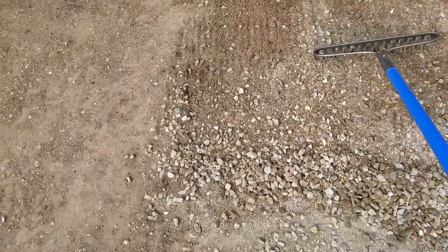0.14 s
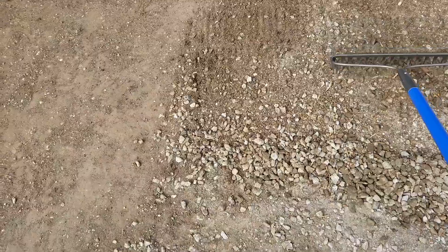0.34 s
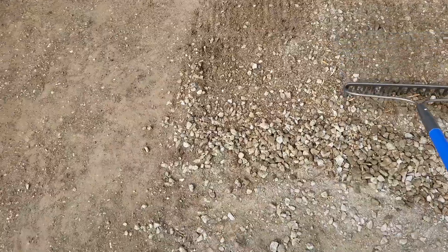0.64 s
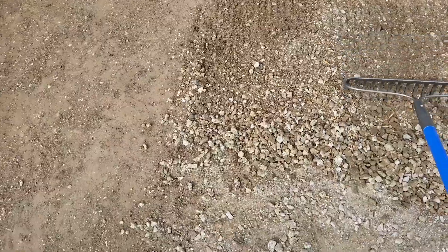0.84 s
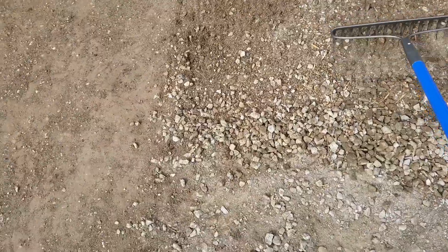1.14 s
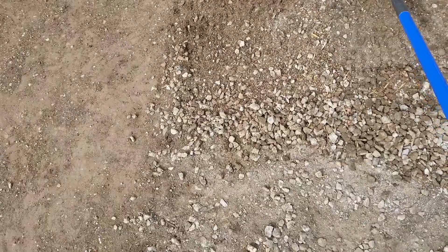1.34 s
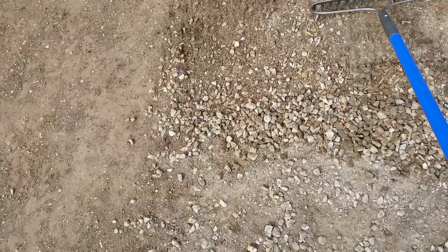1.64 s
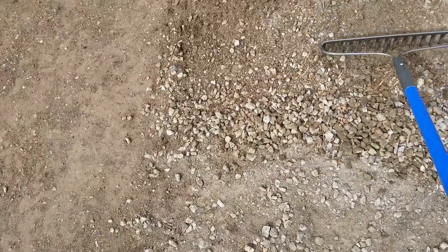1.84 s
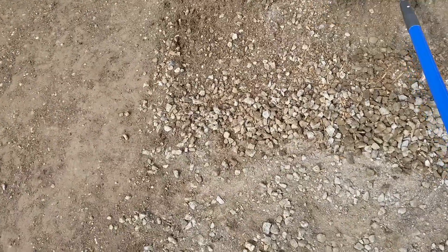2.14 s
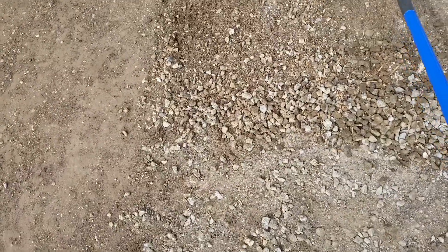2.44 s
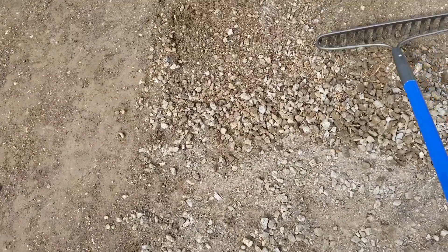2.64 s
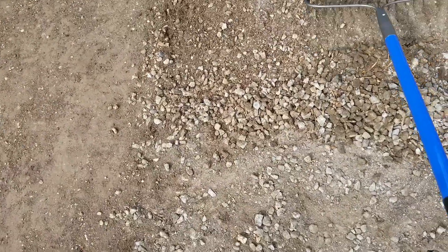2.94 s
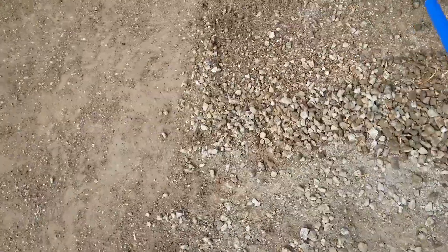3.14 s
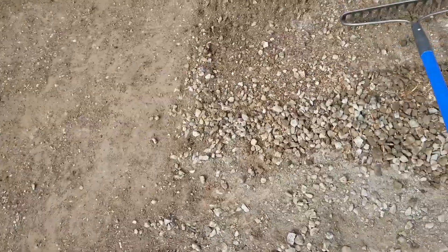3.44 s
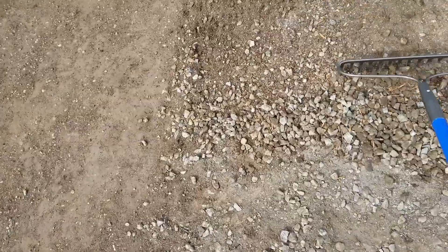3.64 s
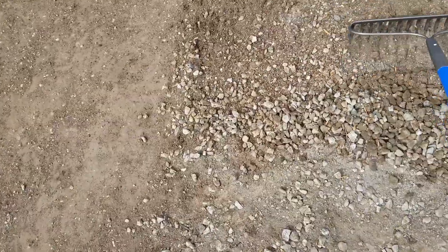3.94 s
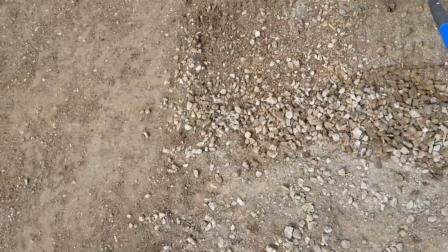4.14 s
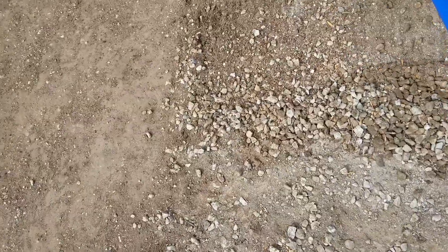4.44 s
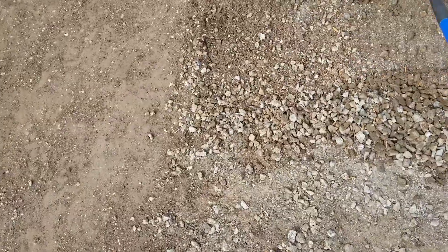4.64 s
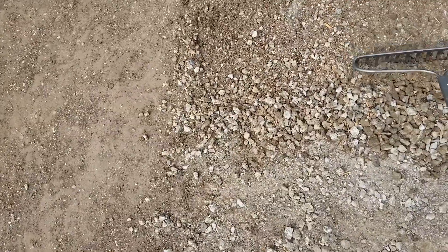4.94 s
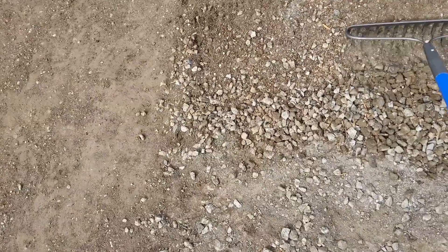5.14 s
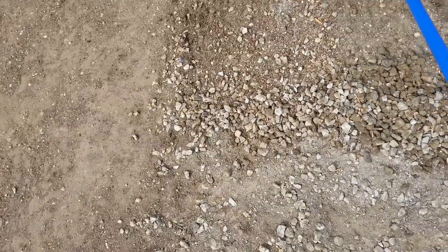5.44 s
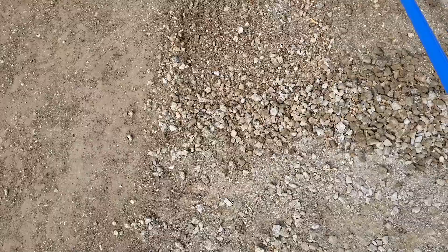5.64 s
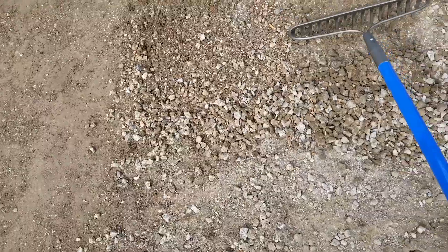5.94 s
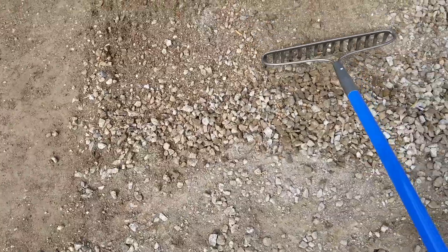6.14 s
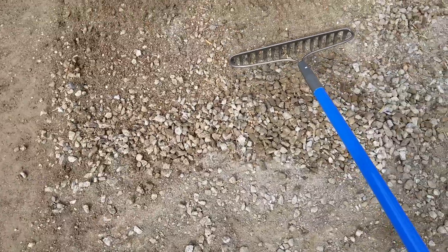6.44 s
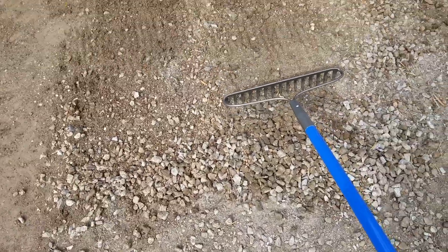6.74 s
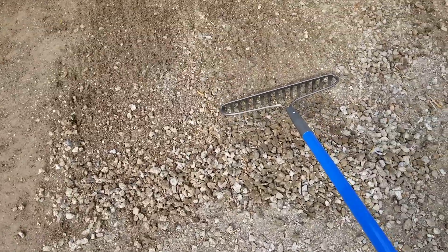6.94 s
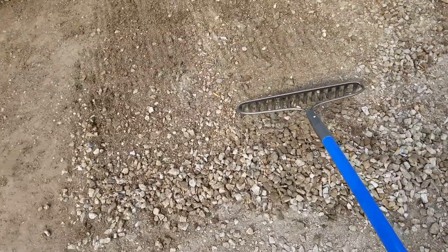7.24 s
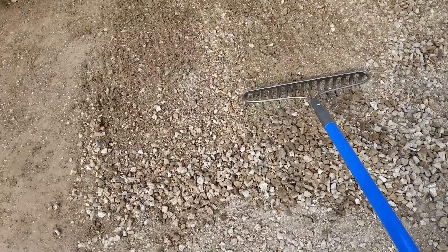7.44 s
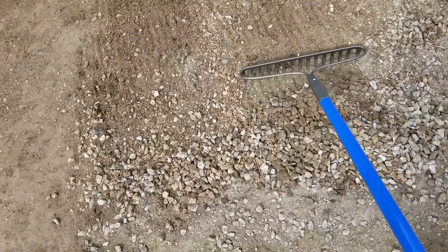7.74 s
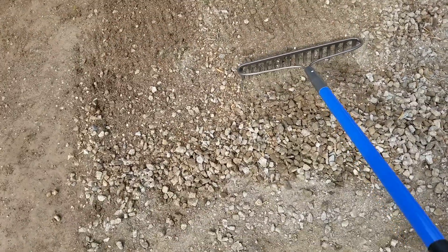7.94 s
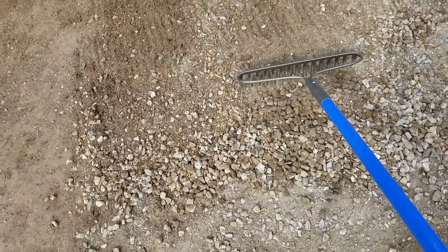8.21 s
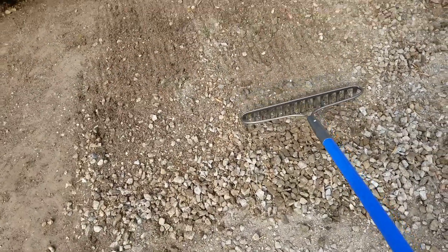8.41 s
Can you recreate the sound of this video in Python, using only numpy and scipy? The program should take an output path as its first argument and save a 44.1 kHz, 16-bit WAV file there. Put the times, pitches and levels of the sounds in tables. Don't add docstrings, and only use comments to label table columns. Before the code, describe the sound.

Outdoors, very close, a steel rake works loose gravel on dry dirt. From 0.1 s it scrapes in uneven strokes of roughly a quarter to half a second: harsh grainy drag, hissing grit, rattling pebbles, sharp stone clacks and short metallic rings from the tines, with duller knocks on the crossbar. A bright squeal comes at 1.1 s, a strong bite near 1.9 s and a dense run of clacks around 2.5 s. At 2.9-3.05 s low thuds and a loud boomy bump shake the microphone. Strokes continue until about 6.2 s, then stop. Sparse faint pebble ticks follow over a distant low engine drone and soft hiss. A small cluster of clacks sounds at 7.3-7.45 s, then faint squeaks and shuffles around 7.7-8.1 s, and a firmer shove with ringing stones from 8.35 s to the end at about 8.6 s. Dry, no reverberation.

```python
import sys
import numpy as np
from scipy import signal
from scipy.fft import rfft, irfft, next_fast_len
from scipy.io import wavfile
from scipy.ndimage import uniform_filter1d, map_coordinates

SR = 44100
rng = np.random.default_rng(int(sys.argv[2]) if len(sys.argv) > 2 else 0)


def waveform_to_disk(signal):
    frames = np.transpose(np.atleast_2d(signal))
    scaled = np.clip(frames, -1, 1) * 32767
    samples = np.round(scaled).astype(np.int16)
    wavfile.write(sys.argv[1], SR, samples)


def level_to_linear(level):
    exponent = np.asarray(level, float) / 20
    return 10 ** exponent


N = 378245


def unit(x):
    return x / np.sqrt(np.mean(x ** 2) + 1e-20)


def along(points, hz):
    f, v = np.transpose(points)
    return np.interp(np.log(hz + 1), np.log(f + 1), v)


def wobble(rate, shape=np.asarray):
    coarse = np.arange(0, N + 64, 64)
    knots = rng.standard_normal(int(N * rate / SR) + 4)
    curve = map_coordinates(knots, [coarse * rate / SR])
    return np.interp(np.arange(N), coarse, shape(curve))


def filtered(x, response):
    m = next_fast_len(N + 8192)
    return irfft(rfft(x, m) * response(np.fft.rfftfreq(m, 1 / SR)), m)[..., :N]


def noise(spectrum, alike, patchy_db=0):
    alike = np.clip(alike, 0, 1)
    common, left, right = rng.standard_normal((3, N + 512))
    pair = np.sqrt(alike) * common + np.sqrt(1 - alike) * np.array([left, right])
    if patchy_db:
        z = signal.stft(pair, nperseg=256)[2]
        field = rng.standard_normal(z.shape[1:])
        field = uniform_filter1d(field, size=3, axis=0)
        field = uniform_filter1d(field, size=9, axis=1)
        pair = signal.istft(z * level_to_linear(patchy_db * unit(field)), nperseg=256)[1]
    return unit(filtered(pair[:, :N], lambda hz: level_to_linear(along(spectrum, hz))))


def pings(s, gain, hz, t60, shift, size, rise_s=1e-5):
    out = []
    for side in (.5, -.5):
        start = s * SR + side * shift
        whole = np.floor(start).astype(int)
        t = np.maximum(np.arange(size) - (start - whole)[:, None], 0) / SR
        rise = 1 - np.exp(-t / rise_s)
        decay = np.exp(-np.log(1000) * t / t60[:, None])
        wave = gain[:, None] * rise * decay * np.sin(2 * np.pi * hz[:, None] * t)
        at = np.clip(whole[:, None] + np.arange(size), 0, N)
        out.append(np.bincount(at.ravel(), wave.ravel(), N + 1)[:N])
    return np.array(out)


def slides(rate, decay_s, spread_db, rest):
    kick = (rng.random(N) < rate / SR) * level_to_linear(spread_db * rng.uniform(-0.85, 1, N))
    return unit(rest + signal.lfilter([1], [1, -np.exp(-1 / (decay_s * SR))], kick))


# (frequency [Hz], level difference [dB])
PORT_BALANCE = [(60, -1.5), (250, -1), (1300, -2), (4400, -3), (15000, -1)]


def rake():
    effort_db = effort()
    busy = slides(rate=60, decay_s=0.013, spread_db=4.5, rest=0.92)
    touch = np.clip((effort_db + 67) / 12, 0, 1)
    bright = level_to_linear(-33 + 0.75 * (effort_db + 30))
    stone_hits, bar_hits = stone_contacts(), crossbar_contacts()

    x = tines(scraping(effort_db, touch, busy), stone_hits, bar_hits)
    x += pebbles(bright * busy * touch) + grit(bright, busy) + soil(effort_db)
    x += clacks(*stone_hits[:3]) + knocks(*bar_hits) + thuds() + rubs()

    lag = 12.85
    side = np.array([[.5], [-.5]])

    def port(f):
        return level_to_linear(side * along(PORT_BALANCE, f)) * np.exp(-2j * np.pi * f * side * lag / SR)

    return filtered(x, port)


# (bite time [s], lift time [s], first level [dB], last level [dB], belly in the middle [dB])
STROKES = [(0.14, 0.581, -30, -35.5, 4.5), (0.783, 1.265, -30.5, -26, -1), (1.445, 1.537, -34, -36, 5.5),
           (1.583, 1.746, -28, -26, 6.5), (1.78, 1.86, -45.5, -40, 2), (1.936, 2.2, -18, -34.5, 0.5),
           (2.347, 2.608, -27, -28, -3), (2.714, 2.948, -35.5, -29, 8.5), (2.997, 3.064, -41, -37, 13.5),
           (3.26, 3.506, -39.5, -26.5, 5), (3.688, 3.979, -34.5, -33, 4.5), (4.15, 4.281, -21, -32, -4.5),
           (4.412, 4.783, -39, -22, 0.5), (5, 5.408, -27, -36.5, 6.5), (5.606, 6.003, -34, -34.5, 4),
           (6.032, 6.073, -55, -50, -5), (5.47, 5.58, -66, -46.5, 0.5), (6.084, 6.227, -27, -34.5, 0)]
NUDGES = [
    (7.02, 7.112, -60, -60.5, 4),
    (7.152, 7.3, -47, -59.5, 5.5),
    (7.313, 7.464, -40.5, -36, 7),
    (7.508, 7.583, -46.5, -54.5, 5),
    (7.656, 7.853, -57.5, -61, 8.5),
    (7.89, 8.186, -61, -54.5, 9),
    (8.225, 8.321, -33, -44.5, 10),
    (8.369, 8.469, -17.5, -37, 2),
    (8.505, 8.586, -36.5, -43, -4.5),
]


def effort():
    bite_db_per_s, lift_db_per_s, rest_db = 214.5, 139.5, -72
    lift_bends = 1000
    t = np.arange(0, N, 32) / SR
    power = level_to_linear(2 * rest_db) + 0 * t
    for bite, lift, first_db, last_db, belly_db in STROKES + NUDGES:
        u = np.clip((t - bite) / (lift - bite), 0, 1)
        db = first_db + (last_db - first_db) * u + belly_db * np.sin(np.pi * u)
        faster = 3.15 if bite > 5.5 else 1
        early, late = faster * np.maximum([bite - t, t - lift], 0)
        db -= bite_db_per_s * early + (lift_db_per_s + lift_bends * late) * late
        power = power + level_to_linear(2 * db)
    return np.interp(np.arange(N) / SR, t, 10 * np.log10(power))


def scraping(effort_db, touch, busy):
    uneven = level_to_linear(5.12 * np.clip(rng.standard_normal(N), -3, 2.5))
    return level_to_linear(effort_db - 9.5) * touch * busy * rng.standard_normal(N) * uneven


# (frequency [Hz], width [Hz], level [dB])
TINE_MODES = [(508, 34, -8.5), (718.6, 14, -5), (772, 35, 0), (909.5, 7.5, -5), (1032, 25, 1.5),
              (1130, 57, 1.5), (1300, 25, 6), (1655, 26, 7.5), (2040, 16, 10), (2255, 75, 10),
              (2758, 11, -1.5), (3180, 33, -6), (3323, 54, -9.5), (3520, 25.2, -8.5), (4190, 16, -3),
              (4840, 40, -6), (5100, 15, -3), (5430, 18, -5.5), (5420, 14, -10), (6160, 30, -3),
              (6380, 56.8, -10), (4440, 15, -8), (5750, 35, -5), (7150, 45, -17), (9320, 55, -15.5),
              (11800, 70, -13), (13600, 80, -10), (8280, 170, -7.5), (10600, 80, -7.5), (2817, 18, -5.5)]


def tines(scrape, stone_hits, bar_hits):
    s, db, stone_hz, chime_db = stone_hits
    bar_s, bar_db, bar_hz = bar_hits
    at = sample_of(s, 90)
    bar_at = sample_of(bar_s, 210)

    def chance(size):
        return rng.choice([-1, 1], size) * level_to_linear(rng.uniform(-4, 4, size))

    out = np.zeros((2, N))
    for hz, width, mode_db in TINE_MODES:
        high_db = 3.9 * (hz > 2500)
        drive = scrape * wobble(12, lambda v: level_to_linear(10.5 * np.tanh(v) - 3.0 - high_db))
        blow = level_to_linear(db + 22.5 + chime_db - 41.0 * np.abs(np.log(hz / stone_hz)))
        drive[at + rng.integers(0, 40, len(s))] += blow * chance(len(s))
        shove = level_to_linear(bar_db + 18.5 - 40 * np.abs(np.log(hz / bar_hz)))
        drive[bar_at + rng.integers(20, 200, len(bar_s))] += shove * chance(len(bar_s))

        r, turn = np.exp(-np.pi * width / SR), 2 * np.pi * hz / SR
        ring = signal.lfilter([np.sqrt(1 - r) * np.sin(turn)], [1, -2 * r * np.cos(turn), r * r], drive)
        out += level_to_linear(mode_db + rng.normal(0, 1, (2, 1))) * [ring, np.roll(ring, shift=rng.integers(0, 3))]
    return out


def sample_of(s, room):
    return np.minimum(np.round(s * SR).astype(int), N - room)


# (time [s], peak level [dB], stone pitch [Hz], tine ring [dB])
CLACKS = [(0.2635, -10, 5430, -9), (0.7777, -12, 4250, -12), (0.929, -6, 3170, -20),
          (1.043, -12.5, 3370, -1), (1.1281, -5.5, 5100, 3.5), (1.211, -8.5, 2210, -18.5),
          (1.6235, -13, 5430, 2), (1.676, -4.5, 3360, -18), (1.897, -21.5, 4630, 8),
          (2.0514, -7.5, 2600, -21), (2.3815, -12, 3800, 3.5), (2.487, -4, 3420, -10.5),
          (2.545, -5.5, 3940, -6), (2.593, -11, 2580, -24), (2.6198, -8.5, 5170, -11),
          (2.8156, -16, 4370, 5), (2.9274, -7.5, 4440, -9), (3.4522, -5, 5130, -17),
          (3.468, -11.5, 3520, -2.5), (3.8615, -10, 3280, -1.5), (3.928, -6, 2900, -8.5),
          (4.095, -15, 2260, -9.5), (4.139, -10.5, 3300, 2), (4.6661, -9, 3170, -8), (4.695, -7, 4870, -3),
          (4.794, -3, 2120, -17), (5.043, -10, 5470, -15), (5.2621, -8, 4190, -2), (5.781, -5, 3180, -14.5),
          (6.098, -17, 3150, -36)]
STRAYS = [(6.5743, -39, 2070, -25), (6.596, -42, 2200, -27), (6.6665, -42.5, 6160, -8),
          (6.7447, -38, 8600, 13), (7.012, -49.5, 6480, -10), (7.0304, -43.5, 6380, 1),
          (7.128, -35.5, 5430, -5), (7.2805, -39, 7200, -10), (7.6256, -32, 10600, -10),
          (7.8204, -39.5, 2250, -7), (8.1375, -43, 2260, -14), (7.1775, -32.5, 2000, -28),
          (7.3398, -22, 4800, 2.5), (7.3602, -18, 2720, -6), (7.3815, -10, 2000, -23),
          (7.428, -15, 2040, -20), (7.5158, -23.5, 2740, -15), (7.636, -25.5, 6160, -19),
          (7.7093, -30.5, 4900, -24), (7.7712, -25.5, 4820, -26), (7.8865, -27, 4820, -7),
          (7.933, -33.5, 4260, 0), (8.055, -23.5, 3950, -6.5), (8.2164, -29.5, 2250, 6.5),
          (8.2478, -29, 2860, 1), (8.359, -13.5, 4770, 1.5), (8.3886, -9.5, 2745, -4),
          (8.404, -12.5, 2980, -24), (8.4562, -23.5, 4670, -15), (8.53, -19.5, 3130, -16),
          (8.55, -12.5, 4640, 2), (8.5628, -16.5, 3000, 8)]
# (time [s], peak level [dB], stone pitch [Hz])
TAPS = [(0.097, -18, 2790), (0.219, -15, 2420), (0.8946, -13.5, 4080), (0.9896, -18, 3180),
        (1.0274, -12, 3460), (1.061, -9.5, 3370), (1.499, -13.5, 6230), (1.5794, -12, 5200),
        (1.949, -10.5, 4070), (2.178, -14, 4560), (3.3513, -16.5, 4180), (3.368, -14, 3560),
        (3.55, -13, 3670), (3.825, -13.5, 4070), (4.1872, -11.5, 5300), (4.2048, -10.5, 3600),
        (4.4258, -18.5, 5360), (4.5394, -12.5, 3000), (4.602, -13, 6100), (4.6415, -12.5, 3380),
        (5.0863, -9.5, 4190), (5.167, -17.5, 2820), (5.6185, -16, 3440), (5.735, -18.5, 2310),
        (5.764, -16.5, 2190), (5.808, -14.5, 3000), (5.9353, -21, 4760), (2.479, -8, 4180),
        (3.48, -12, 3430), (4.724, -12, 2260), (4.288, -20.5, 4200), (1.627, -17, 1910),
        (6.005, -26.5, 4260), (6.219, -23.5, 3340), (0.853, -17, 4200)]
MORE_TAPS = [(0.183, -29.5, 2800), (0.3017, -17, 2320), (0.3596, -19, 2250), (0.4494, -19.5, 3500),
             (0.5082, -25.5, 3520), (0.5282, -23, 2360), (0.6594, -29.5, 8650), (0.707, -26.5, 5000),
             (0.7582, -18, 4000), (0.8066, -10.5, 4260), (1.0126, -15.5, 3600), (1.2985, -23.5, 4100),
             (1.3384, -21, 4200), (1.4486, -21.5, 3200), (1.6416, -5, 5500), (1.7038, -13.5, 4260),
             (1.8206, -23, 2860), (1.8607, -24.5, 4300), (1.9076, -9, 4790), (1.9964, -18.5, 4080),
             (2.0198, -10, 4580), (2.109, -20, 2750), (2.3356, -18, 4190), (2.4369, -20.5, 4160),
             (2.4868, -10, 3310), (2.5167, -11, 3400), (2.7237, -21.5, 5700), (2.7676, -26, 4180),
             (2.9766, -22, 2770), (3.0143, -21.5, 6000), (3.2317, -24, 5100), (3.2889, -29.5, 4100),
             (3.322, -21, 3400), (3.4368, -14, 4200), (3.4675, -9.5, 3520), (3.5289, -15, 3230),
             (3.6531, -27.5, 3530), (3.687, -19, 7180), (3.742, -15, 3190), (3.812, -17, 4250),
             (3.8506, -11, 2780), (3.8952, -11.5, 2830), (4.1579, -14.5, 2870), (4.2227, -13, 2780),
             (4.3899, -26, 2200), (4.4568, -16, 2330), (4.4798, -19.5, 2820), (4.5156, -18.5, 4200),
             (4.7551, -15, 2260), (4.8429, -22, 2860), (4.905, -26.5, 2840), (4.987, -31, 2300),
             (5.006, -18, 6430), (5.1357, -11.5, 2780), (5.1837, -12, 5260), (5.206, -17, 3230),
             (5.2432, -14, 4350), (5.3305, -14, 3170), (5.6705, -23, 5110), (6.1874, -19, 3930)]


def stone_contacts():
    taps = [(*tap, -4.5) for tap in TAPS]
    more_taps = [(*extra, -5) for extra in MORE_TAPS]
    return np.transpose(CLACKS + STRAYS + taps + more_taps)


# (frequency [Hz], density [dB per Hz])
SPLINTERS = [(300, -40.5), (800, 4.5), (2000, 2.5), (5000, 4), (9500, -1), (14200, 2), (16000, -3.5)]


def clacks(s, db, hz):
    clack = pings(s, level_to_linear(db - 8), hz, .025 + 0 * s, rng.normal(0, 1.5, len(s)), size=900)
    burst = np.zeros(N)
    burst[sample_of(s, 90)] = level_to_linear(db - 10)
    crack = level_to_linear(-1.5) * signal.lfilter([1], [1, -level_to_linear(-60 / (0.0054 * SR))], burst)
    rise = 0.48 * signal.lfilter([1], [1, -np.exp(-1 / (0.0013 * SR))], burst)
    tail = signal.lfilter([.05], [1, -level_to_linear(-60 / (0.053 * SR))], rise)
    return clack + (crack + tail) * noise(SPLINTERS, 0.13, patchy_db=5.0)


# (time [s], peak level [dB], pitch [Hz])
KNOCKS = [(0.213, -16.5, 995), (0.298, -9.5, 996), (0.453, -16, 680), (1.077, -11, 674), (1.131, -8.5, 657),
          (1.214, -10, 940), (1.497, -8, 798), (1.621, -5.5, 717), (1.643, -9.5, 1300), (1.677, -12, 1170),
          (1.897, -9, 1300), (2.049, -5, 760), (2.481, -7, 1330), (2.847, -9, 1020), (2.921, -7, 864),
          (3.328, -12.5, 1350), (3.488, -11, 750), (3.686, -14.5, 790), (3.86, -9, 1170),
          (4.095, -17.5, 1300), (4.667, -17, 1300), (4.797, -14, 870), (5.121, -23, 1220),
          (5.263, -12.5, 760), (5.736, -13, 1032), (5.784, -10, 1340), (7.374, -13, 1277),
          (8.25, -15.5, 965), (8.357, -16.5, 980), (8.551, -3.5, 1450)]
BUMPS = [(0.097, -26, 1310), (0.15, -30, 670), (0.184, -18, 767), (0.231, -23, 1040), (0.264, -22, 754),
         (0.32, -19, 1030), (0.361, -26, 755), (0.416, -16, 700), (0.466, -22.5, 1320), (0.534, -21, 714),
         (0.783, -36, 1300), (0.811, -22, 1250), (0.851, -25.5, 1300), (0.892, -19, 697),
         (0.988, -26, 1300), (1.183, -24, 778), (1.585, -17.5, 1310), (1.704, -15, 1140), (1.776, -21, 935),
         (1.961, -15, 1050), (2.009, -21, 1650), (2.175, -22.5, 764), (2.319, -24, 1030),
         (2.353, -11.5, 690), (2.436, -21, 1300), (2.547, -16, 1180), (2.592, -23, 1680),
         (2.736, -19.5, 740), (2.814, -11, 1640), (2.976, -14.5, 540), (3.027, -24, 1164),
         (3.304, -23, 753), (3.352, -16, 1090), (3.46, -18, 1110), (3.531, -18.5, 750), (3.746, -20, 744),
         (3.781, -30.5, 980), (3.815, -12, 960), (3.918, -25, 1010), (4.145, -28, 1050), (4.209, -23, 680),
         (4.513, -18, 730), (4.542, -18, 747), (4.64, -23.5, 1030), (4.7, -16.5, 1300), (4.753, -21, 1000),
         (5.004, -32, 775), (5.044, -19, 729), (5.095, -25, 1280), (5.219, -15.5, 1300),
         (5.335, -15.5, 717), (5.617, -18, 1300), (5.675, -18.5, 750), (5.764, -15.5, 584),
         (5.811, -14.5, 1300), (6.133, -23, 752), (7.347, -29, 1010), (7.427, -26, 1300),
         (7.544, -27, 1140), (8.206, -31, 1170)]


def crossbar_contacts():
    bumps = [(s, db + 1.5, hz) for s, db, hz in BUMPS]
    return np.transpose(KNOCKS + bumps)


def knocks(s, db, hz):
    return pings(s, level_to_linear(db - 4.0), hz, 0.044 + 0 * s, 0 * s, size=1600, rise_s=0.00098)


def pebbles(level):
    clicks = stones(level, centre_hz=4600, cycles=12.0, count=10000, size=200)
    chips = stones(level, centre_hz=8057, cycles=420, count=1200, size=900)
    return level_to_linear(-4.5) * clicks + level_to_linear(-6.5) * chips


def stones(level, centre_hz, cycles, count, size):
    pitch, life, place, big = rng.standard_normal((4, count))
    u = rng.random(count)
    hz = np.clip(centre_hz * np.exp(.65 * pitch), 600, 15500)
    gain = level_to_linear(5.95 * np.clip(big, -3, 2.2)) * np.sqrt(hz / 5000) * level[(u * N).astype(int)]
    return pings(u * N / SR, gain, hz, cycles * np.exp(.5 * life) / hz, 2 * place, size)


# (frequency [Hz], density [dB per Hz])
GRIT = [(180, -52.5), (300, -34.5), (749, -1.5), (946, 5), (1300, 5.5), (1810, 5), (2250, -6.5), (5250, 3),
        (9090, -6.5), (14200, 3), (16000, -8)]


def grit(bright, busy):
    trickle = slides(rate=57, decay_s=0.0055, spread_db=-13.5, rest=1.0)
    return level_to_linear(-1.5) * bright * busy ** 0.35 * trickle * noise(GRIT, 0.026, patchy_db=4.0)


# (frequency [Hz], density [dB per Hz])
SOIL = [(80, -32), (160, 7), (300, -17.5), (500, -15), (900, -22.5), (2000, -54)]


def soil(effort_db):
    return level_to_linear(-47.5 + 0.17 * (effort_db + 30) + 5.1 * wobble(30)) * noise(SOIL, 0.82)


# (time [s], peak
# level [dB], pitch [Hz])
THUDS = [(1.029, -31, 188), (1.612, -19.5, 181), (1.758, -26.5, 308), (1.876, -36, 210), (2.836, -28, 172),
         (2.92, -15, 310), (2.947, -10, 161), (2.974, -20.5, 330), (3.0, -28, 241), (3.027, -24, 198),
         (2.045, -23, 425), (3.438, -25.5, 172), (4.13, -24, 115), (4.754, -28, 168), (5.176, -24, 140),
         (6.514, -28.5, 299), (7.296, -20, 267.6), (8.297, -20, 190), (8.31, -21, 314)]


def thuds():
    s, db, hz = np.transpose(THUDS)
    thud = pings(s, level_to_linear(db + 4.5), hz, 0.065 + 0 * s, 0 * s, size=5000)
    return uniform_filter1d(thud, size=41, axis=1)


# (time [s], length [s], pitch [Hz], level [dB])
RUBS = [
    (7.7, .065, 1310, -42),
    (7.77, .07, 1310, -43),
    (7.97, .21, 2270, -46),
    (8.05, .1, 2850, -54),
    (7.03, .05, 6900, -57),
    (2.57, .08, 1660, -35),
    (1.13, .07, 5100, -26),
    (1.225, .06, 5100, -34),
    (1.62, .04, 5430, -28),
]


def rubs():
    out = np.zeros(N)
    for s, length, hz, db in RUBS:
        t = np.arange(round(length * SR)) / SR
        window = np.hanning(round(40 * SR / hz))[None]
        flutter = unit(signal.fftconvolve(rng.standard_normal((2, len(t))), window, "same", axes=1))
        swell = np.sqrt(np.abs(np.sin(np.pi * t / length)))
        tone = flutter[0] * np.sin(2 * np.pi * hz * t) + flutter[1] * np.cos(2 * np.pi * hz * t)
        out[round(s * SR):][:len(t)] += level_to_linear(db) * swell * tone
    return out


# (time [s], peak level [dB], pitch [Hz], t60 [s])
JOLTS = [(2.923, 9.5, 258, 0.072), (2.93, 3, 140, 0.095), (2.941, 10, 232, 0.027),
         (2.9506, 10.5, 164, 0.073), (2.966, -2.5, 91.3, 0.074), (2.977, -14, 470, 0.04),
         (2.999, -12, 110, 0.052), (3.002, -19.5, 260, 0.05), (3.031, 1.5, 132.4, 0.032),
         (3.055, -9, 70.6, 0.13), (5.69, -14, 60, 0.14)]


def jolts():
    s, db, hz, t60 = np.transpose(JOLTS)
    return pings(s, level_to_linear(db - 4), hz, t60, 0 * s, size=6000) * [[.8], [-1]]


# (time [s], level [dB])
DRONE = [(0.0, -23.5), (0.02, -38.5), (0.52, -36), (1.12, -31.5), (2.2, -36), (2.32, -29), (2.74, -42),
         (2.96, -30), (3.13, -48), (3.3, -38), (5.73, -38), (6.85, -31), (7.07, -32), (7.14, -28.5),
         (7.31, -32), (8.58, -34)]
# (frequency [Hz], density [dB per Hz])
DRONE_COLOUR = [(15, -49.5), (25, -31.5), (60, -4), (81, -1), (108, -9), (153, -14.5), (179, -17),
                (299, -25.5), (364, -32.5), (700, -44.5), (910, -73.5), (1540, -120)]


def drone():
    s, db = np.transpose(DRONE)
    level_db = np.interp(np.arange(N) / SR, s, db)
    return level_to_linear(level_db + 1.5 * wobble(40)) * noise(DRONE_COLOUR, 0.92)


# (frequency [Hz], density [dB per Hz])
HISS = [(240, -38), (500, -1.5), (900, -12.5), (2500, -9.5), (3100, -23.5), (7400, -26.5), (9300, -25),
        (11600, -12), (16000, -14)]


def hiss():
    return level_to_linear(-53.5 + 0.72 * wobble(3.9)) * noise(HISS, 0.0724)


def scene():
    return rake() + jolts() + drone() + hiss()


def band_limit(x):
    return signal.sosfilt(signal.butter(12, 15950, fs=SR, output="sos"), x)


def record(dry):
    mix = np.clip(dry, -1, 1)
    return band_limit(mix)


dry = scene()
out = record(dry)
waveform_to_disk(out)
```